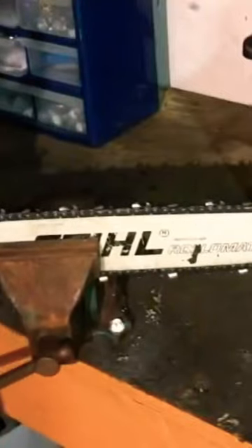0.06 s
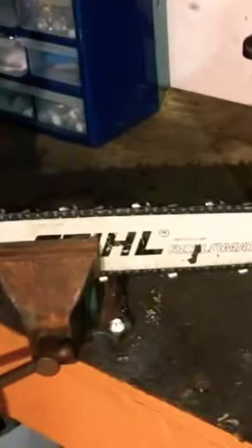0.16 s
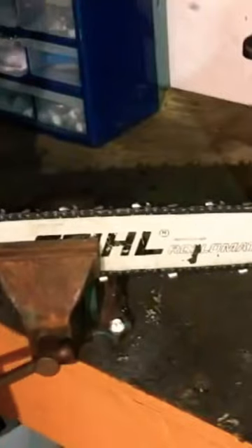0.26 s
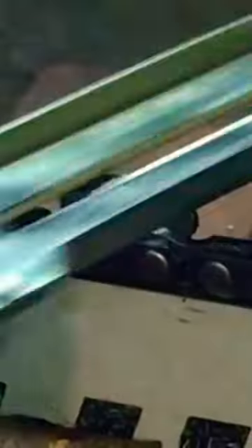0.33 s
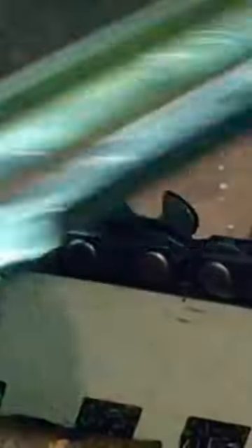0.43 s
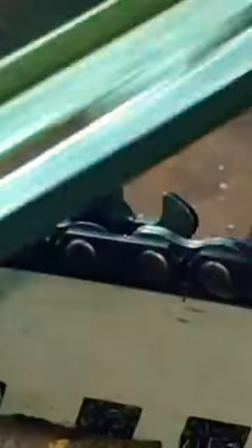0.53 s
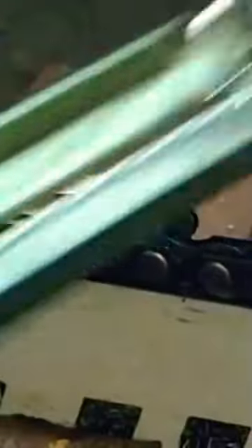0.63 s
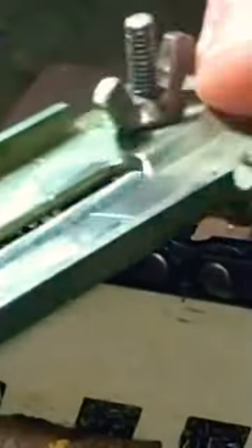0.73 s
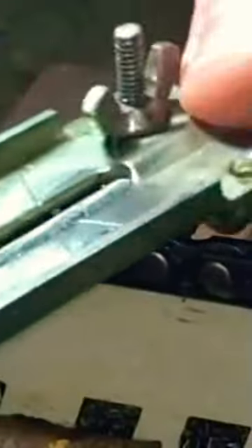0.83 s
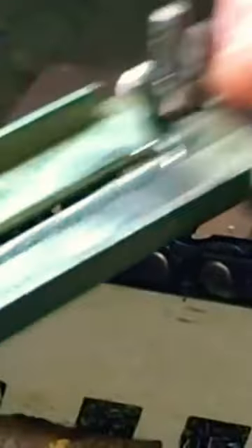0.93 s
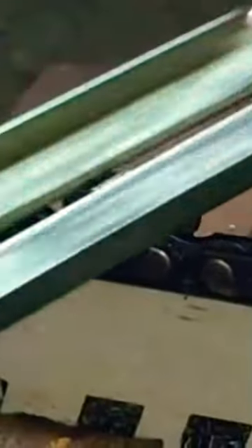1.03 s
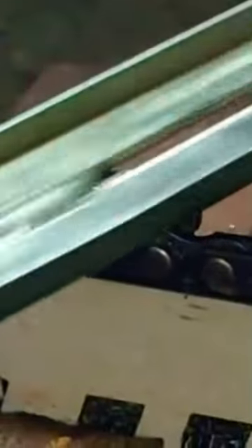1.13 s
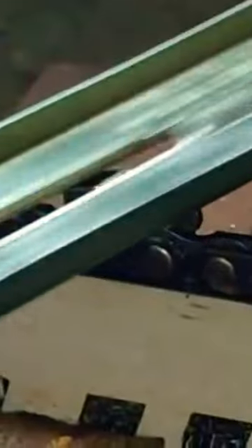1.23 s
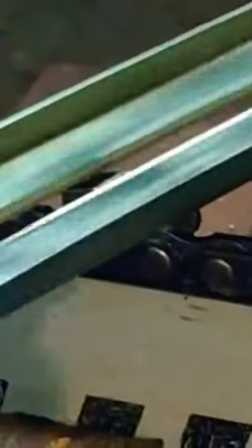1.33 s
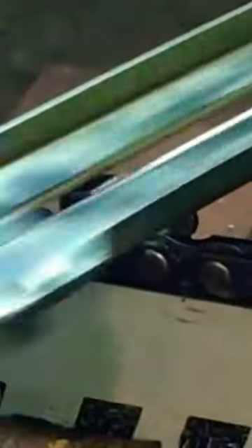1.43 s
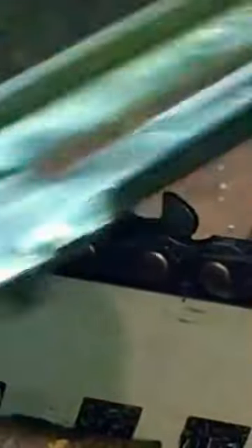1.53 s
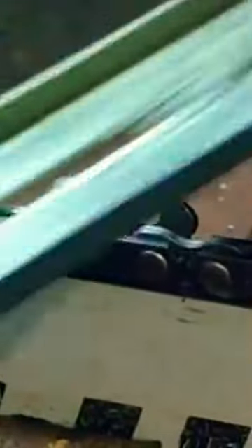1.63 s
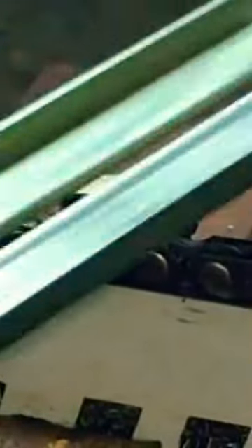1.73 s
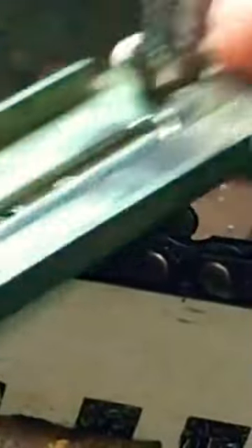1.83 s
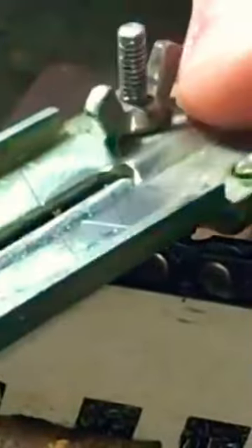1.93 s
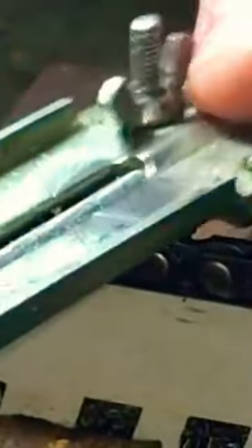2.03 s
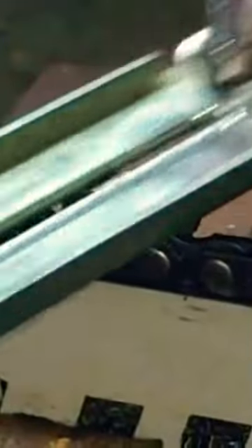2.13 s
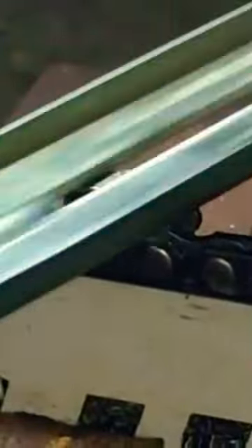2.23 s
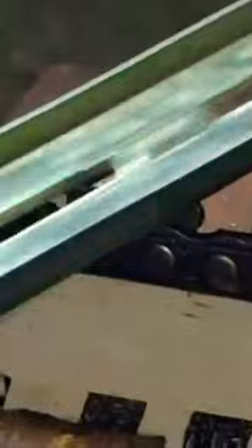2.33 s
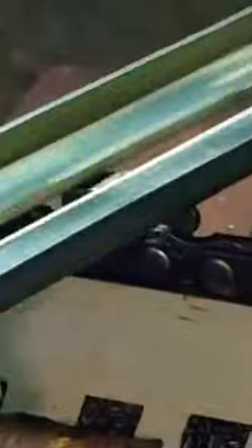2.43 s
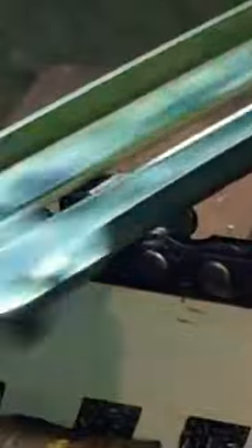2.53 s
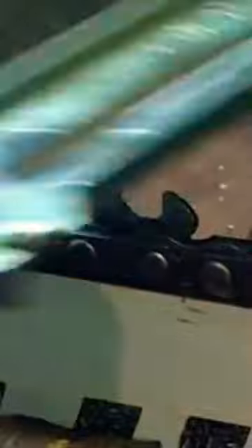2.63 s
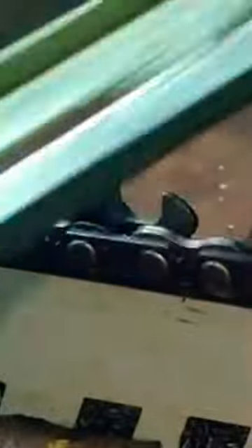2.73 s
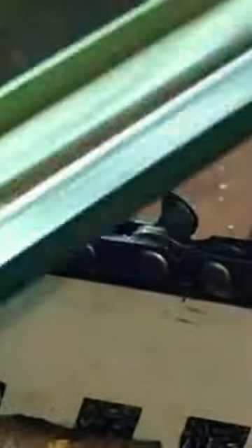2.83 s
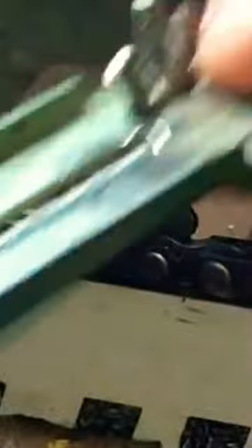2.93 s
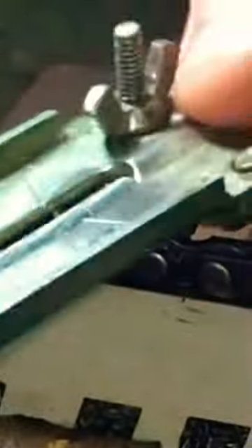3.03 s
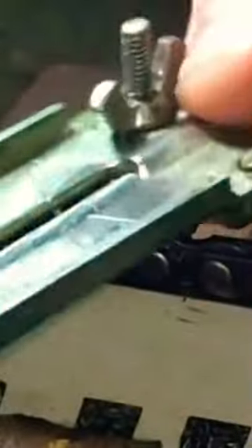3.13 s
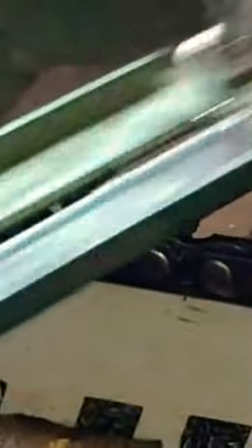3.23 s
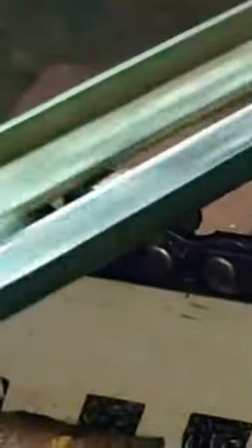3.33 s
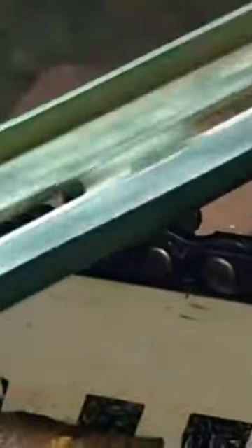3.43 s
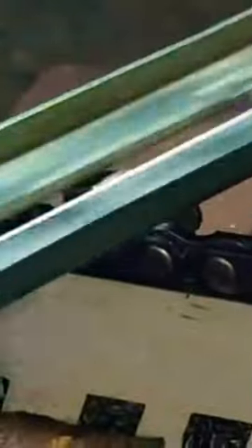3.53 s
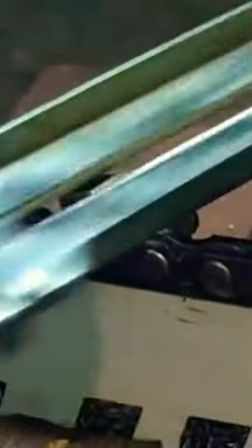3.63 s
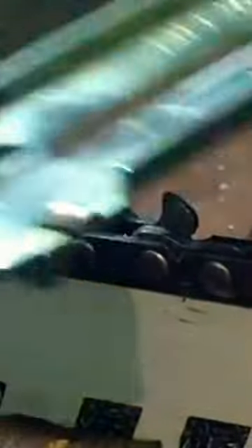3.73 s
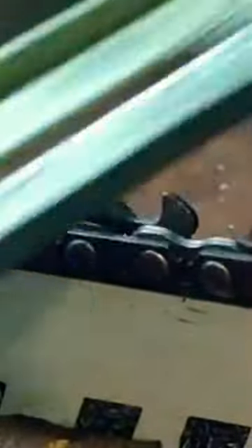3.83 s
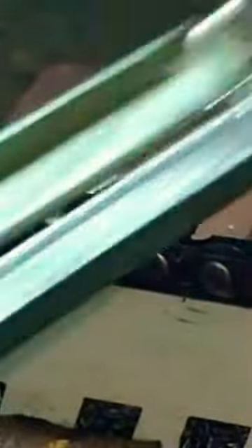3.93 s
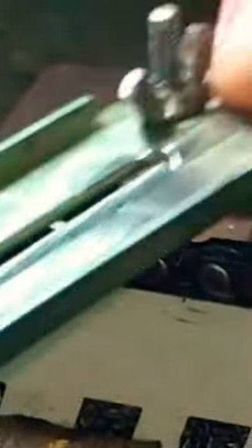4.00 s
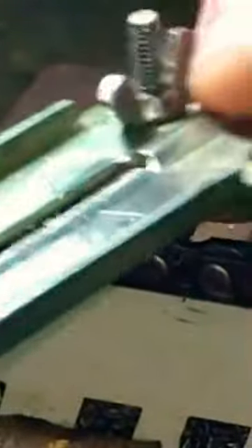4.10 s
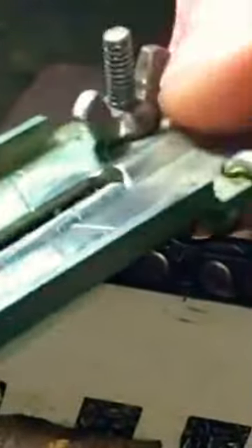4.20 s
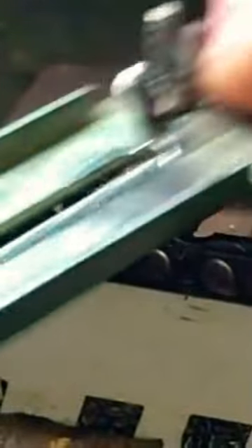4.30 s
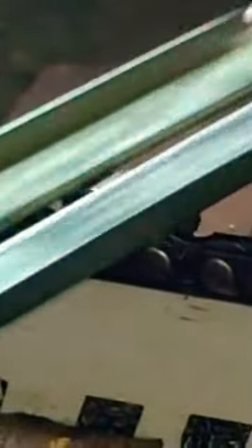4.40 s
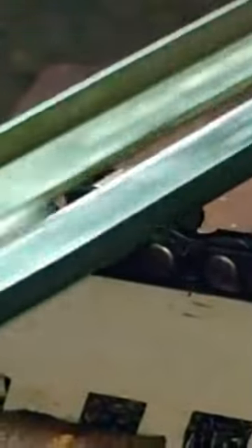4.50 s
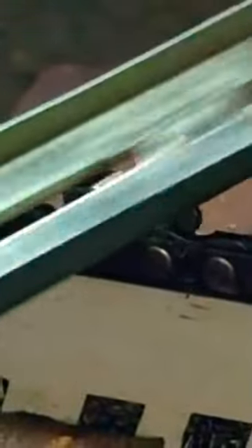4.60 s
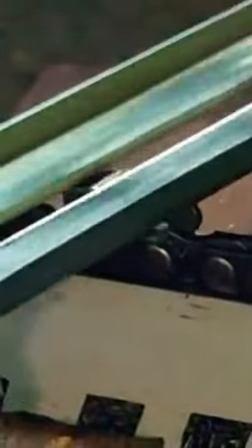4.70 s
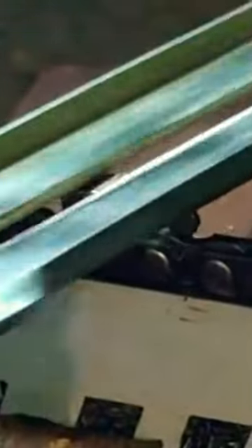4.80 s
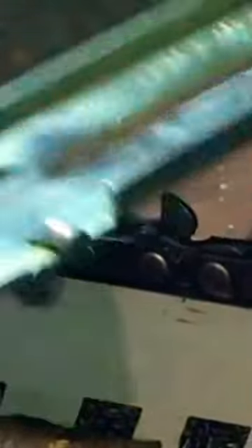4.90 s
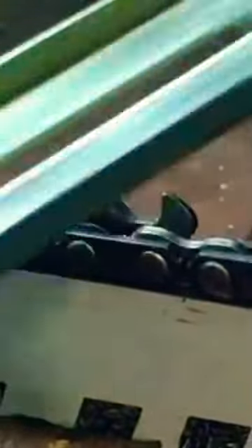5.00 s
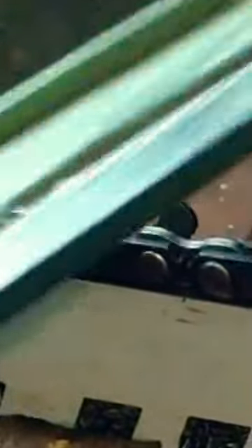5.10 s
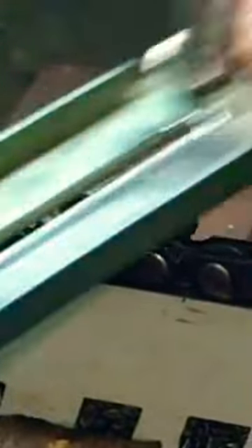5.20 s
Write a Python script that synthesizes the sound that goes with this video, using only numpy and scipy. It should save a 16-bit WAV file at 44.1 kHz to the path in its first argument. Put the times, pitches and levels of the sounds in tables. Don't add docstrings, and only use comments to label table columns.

```python
import sys
import numpy as np
from scipy import signal
from scipy.fft import rfft, irfft
from scipy.io import wavfile
from scipy.ndimage import uniform_filter1d, map_coordinates

SR = 44100
rng = np.random.default_rng(int(sys.argv[2]) if len(sys.argv) > 2 else 0)


def boost_factor(decibels):
    exponent = np.asarray(decibels, float) / 20
    return 10 ** exponent


def waveform_to_disk(signal):
    frames = np.transpose(np.atleast_2d(signal))
    scaled = np.clip(frames, -1, 1) * 32767
    samples = np.round(scaled).astype(np.int16)
    wavfile.write(sys.argv[1], SR, samples)


N = 231853

# (start [s], end [s])
STROKES = [
    (-.05, 0.32),
    (1.08, 1.61),
    (2.2, 2.78),
    (3.27, 4),
    (4.42, 5.07),
]
# (time [s], pressure [dB], edge bite [dB])
PUSHES = [
    [(.327, -38, -2), (.341, -35.5, -3), (.379, -39.5, 1), (.391, -35.5, 0), (.443, -40, 1.5),
     (.489, -55, 4), (.65, -70, 5)],
    [(1.04, -55, -2.5), (1.124, -36.5, 1), (1.21, -34.5, 2), (1.54, -37.5, -1.5), (1.56, -53.5, -1),
     (1.606, -51, 0.5), (1.632, -65, -2), (1.73, -71, 1)],
    [(2.12, -65.5, -1), (2.194, -46, 0), (2.326, -34.5, 2), (2.45, -35, 1), (2.594, -36.5, -2.5),
     (2.668, -40, 1.5), (2.704, -56.5, 4), (2.83, -69, 2)],
    [(3.23, -67, 3), (3.268, -49.5, -3), (3.324, -40, 1), (3.39, -37, 2), (3.634, -36, 1.5),
     (3.75, -38.5, 1), (3.794, -60.5, 3.5), (3.91, -71, -1)],
    [(4.385, -72, -4), (4.39, -49.5, -1), (4.478, -38, 3), (4.65, -35, 1), (4.776, -35, 2.5),
     (4.93, -42, -1.5), (4.966, -60, -1.5), (5.13, -71, -5)],
]
# (level above pressure [dB], share of bite [dB per dB])
PARTS = [
    (-14, -.5),
    (-5, -.5),
    (-7, .6),
    (-9.5, 1.0),
    (-4.5, -.5),
]
THUD, BAR, FILE, FIZZ, BENCH = range(5)
# (frequency [Hz], width [Hz], level [dB], swell [dB], turn [rad])
STEEL_MODES = [(496, 70, -17, -4, .2), (725, 65, 4.5, 4, 1.3), (1010, 80, 0.5, -7.5, 2.13),
               (1497, 38, -0.5, 4.5, 4.6), (1628, 106, -2.5, 7, 1.4), (2195, 84, -6.5, 13, 0.43),
               (2375, 120, 0, 4, 1.6), (2520, 105, -6, 6, 3.6), (2650, 110, -4, 6, 2.2),
               (3473, 150, -8.5, -6, 2.8), (3730, 160, -4.5, 10, 4.13), (3980, 150, -13, 8.5, 3.5),
               (4250, 200, -9, 11.5, 3.5), (4500, 200, -9, 6, 5.6), (5726, 73, -2, 3.5, 0.75),
               (5930, 170, -13, 19.5, 5.4), (6420, 40, -5.5, -1.5, 3.8), (8400, 130, -13.5, 0, 2.2),
               (9100, 87, -23, -9, 6.2), (11280, 390, -19, 8, 1.9), (12200, 250, -14, 1, 1.1),
               (14000, 410, -20, 5.5, 1.4)]
# (frequency [Hz], density [dB per Hz])
GRIT_SPECTRUM = [(200, -34.5), (380, -3), (600, -7), (1000, -2), (1600, -4.5), (2450, -1), (3050, -13),
                 (4200, -5), (5100, -9), (6100, -12), (8000, -16), (10500, -18.5), (13500, -20.5),
                 (15600, -18.5)]
# (time [s], slide [s], steel [dB], fizz above steel [dB], wood [dB])
LANDINGS = [(.861, 0.0054, -43, 0, -49), (0.943, 0.048, -64, 4, -52), (0.977, 0.0056, -47, 6.5, -43.5),
            (2.031, 0.0063, -48, 9, -43), (3.122, 0.014, -59, 8, -48), (4.133, 0.038, -49.5, -1.5, -46.5),
            (4.257, 0.058, -59, 7.5, -48), (4.974, 0.0084, -55, -4, -64)]
LIFT_RATES = [434, 673, 945, 1160, 237]
# (time [s], peak [dB], treble above peak [dB], ring above peak [dB], decay [s])
KNOCKS = [(0.8608, -38.5, -7, 0, 0.027), (0.9488, -33.5, -10, -10, 0.017), (0.9562, -40, 6, -23, 0.0072),
          (0.9747, -27, -28, -3.5, 0.017), (0.9811, -35.5, 13.5, -10, 0.011), (1.5342, -27, 0, -11, 0.023),
          (2.0308, -33, 0.5, -8, 0.033), (2.2978, -30, -12, -11, 0.028), (2.6626, -18, -19, -12, 0.017),
          (3.1222, -36.5, -5, -5, 0.018), (3.134, -42.5, 11.5, -15, 0.0074), (4.0164, -69, 14, -13, 0.018),
          (4.1335, -32, -1.5, -8, 0.028), (4.257, -41, -3, 0, 0.022), (4.2639, -32.5, 1.5, 2.5, 0.053),
          (4.282, -32.5, -12, -17, 0.046), (4.3114, -45, -1, -9, 0.021), (4.976, -44, -3, -8, 0.024)]
# (time [s], peak [dB])
SLIPS = [(0.2088, -53), (1.077, -40), (1.599, -41), (2.175, -50), (3.2627, -39), (4.1598, -36),
         (4.3887, -43)]
# (treble above peak [dB], ring above peak [dB], decay [s])
SLIP_TONE = (-32, -21, 0.012)
# (frequency [Hz], level [dB], decay [s])
HOLDER_MODES = [(1868, -6, .02), (2600, -6, .03), (4100, -8, .02), (6471, 3, .075), (8075, -14, .03),
                (9970, -12, .04), (12540, -11, .015), (14550, -10, .015)]
# (frequency [Hz], width [Hz], level [dB])
BENCH_MODES = [(111, 26, -3), (123, 109, -10.5), (179.6, 20.3, -1.5), (202.4, 26.7, 0.5), (257.2, 20, -6),
               (263.5, 12.6, 1.5)]
# (time [s], sway [dB], bench above pressure [dB])
JOLTS = [(0.359, -39.5, 5.5), (.47, -39.5, 1), (.54, -51, -5), (.92, -51, 0), (1.0, -52, 21),
         (1.2, -46, -4), (1.33, -39.5, 3.5), (1.44, -43.5, 0.5), (1.9, -59, 0), (2.06, -52, 0),
         (2.27, -39.5, 3.5), (2.48, -41, 0), (2.62, -45, -1), (3.15, -54.5, 0), (3.36, -43, -1),
         (3.55, -40, 7), (3.73, -44, -4.5), (4.45, -48, 6), (4.55, -41, 3), (4.68, -32.5, 1.5),
         (4.86, -48, 6.5), (4.919, -40.5, -3.5), (5.02, -44.5, -2), (5.09, -55, -1)]
# (frequency [Hz], density [dB per Hz])
AIR_FIRST = [(15, -40), (25, -7), (60, 6.5), (245, -7.5), (457, -6), (600, -18), (669, -11), (1010, -16.5),
             (1150, -14), (1680, -16.5), (2820, -20.5), (3510, -20), (16500, -38)]
# (frequency [Hz], density [dB per Hz])
AIR_SECOND = [(53, -35), (90, -1), (119, -11.5), (145, -19), (183, 3.5), (209, -17.5), (301, -14),
              (328, -17.5), (1250, -26), (1480, -26.5), (2430, -25.5), (3900, -31.5), (4640, -31.5),
              (15500, -40.5)]
# (time [s], swell [dB])
RETURNS = [(.56, 3.5), (.72, 2.5), (1.03, 5.5), (1.96, 2), (2.97, 2), (3.08, 0.5), (4.27, 3.5)]
# (time [s], frequency [Hz], level [dB], spread [s])
SQUEAK = (1.88, 4570, -75, .012)

CUT_S = .327
BAND_EDGES_HZ = (640, 3100, 7400)


def rasp():
    rest = steel(bites(share=.32, spread_db=1.6)) * boost_factor(0.49 * walk(150) + 0.96 * walk(39))
    wood, rest = split(rest, BAND_EDGES_HZ[0], order=5)
    push_thud = level(split(wood, 610, order=1)[0], 0)
    out = push_thud * boost_factor(pushed(THUD) + 1.84 * walk(14))
    land_thud = level(split(wood, 450, order=3)[0], 0)
    out += land_thud * landed(THUD)
    for part, hz in zip((BAR, FILE), BAND_EDGES_HZ[1:]):
        band, rest = split(rest, hz, order=5)
        out += level(band, 0) * np.hypot(boost_factor(pushed(part)), landed(part))
    return out + level(rest, 0) * np.hypot(boost_factor(pushed(FIZZ)), landed(FIZZ))


def bites(share, spread_db):
    size = boost_factor(spread_db * rng.exponential(size=N)) * (rng.random(N) < share)
    return level(size * rng.standard_normal(N), 0)


def steel(drive):
    t = np.arange(N) / SR
    place = 5.5 * np.interp(t, np.ravel(STROKES), np.tile([0, 1], len(STROKES)))
    rings = 0
    for hz, width, db, swell_db, turn in STEEL_MODES:
        damped_width = max(width, 70, hz / 24)
        mode_db = db + swell_db * np.cos(place - turn) + 2.55 * walk(18)
        rings = rings + boost_factor(mode_db) * resonate(drive, hz, damped_width)
    seat_db = .4 * np.clip(pushed(FILE) + 45, -20, 0) - 5 * (np.arange(N) < .7 * SR)
    grit = patchy(colour(drive[::-1], GRIT_SPECTRUM), spread_db=2.6, wide=2, long=7)
    return level(grit, -3) + level(rings, -2.2) * boost_factor(seat_db)


def patchy(x, spread_db, wide, long):
    cells = signal.stft(x, nperseg=512)[2]
    field = rng.standard_normal(cells.shape)
    field = uniform_filter1d(uniform_filter1d(field, wide, axis=0), long, axis=1)
    return signal.istft(cells * boost_factor(spread_db * field / field.std()), nperseg=512)[1][:N]


def pushed(part):
    t, db = np.arange(N) / SR, np.full(N, -150.)
    above_db, bite_share = PARTS[part]
    for s, pressure_db, bite_db in map(np.transpose, PUSHES):
        span = (t >= s[0]) & (t < s[-1])
        db[span] = np.interp(t[span], s, pressure_db + above_db + bite_share * bite_db)
    return db


def landed(part):
    t, power = np.arange(N) / SR, 0
    for s, slide, steel_db, fizz_db, wood_db in LANDINGS:
        db = (wood_db, steel_db, steel_db - 9, steel_db + fizz_db, wood_db + 3)[part]
        rise = np.clip((t - s) / 0.0013, 0, 1)
        fall_db = LIFT_RATES[part] * np.maximum(t - s - slide, 0)
        power = power + (rise * boost_factor(db - fall_db)) ** 2
    return np.sqrt(power)


def knocks():
    out, t = np.zeros(N + SR), np.arange(SR // 10) / SR
    slips = [(*slip, *SLIP_TONE) for slip in SLIPS]
    for s, db, treble_db, ring_db, decay in KNOCKS + slips:
        noise = rng.standard_normal(len(t)) * decaying(t, max(decay, .002))
        low, high = split(split(noise, 710)[1], 5570)
        crack = low / np.abs(low).max() + boost_factor(treble_db) * high / np.abs(high).max()
        ring = 0
        for hz, mode_db, t60 in HOLDER_MODES:
            gain_chance, pitch_chance = rng.standard_normal(2)
            tone = np.sin(2 * np.pi * hz * (1 + 0.00033 * pitch_chance) * t)
            ring = ring + boost_factor(mode_db + gain_chance) * tone * decaying(t, t60)
        i = int(s * SR)
        out[i:i + len(t)] += boost_factor(db) * (crack + boost_factor(ring_db) * ring / np.abs(ring).max())
    return out[:N]


def bench():
    hum = 0
    for hz, width, db in BENCH_MODES:
        mode = resonate(resonate(rng.standard_normal(N), hz, 1.5 * width), hz, 1.88 * width)
        hum = hum + boost_factor(db + 0.47 * walk(12)) * mode
    push = rng.standard_normal(N)
    sway = resonate(resonate(push, 45.8, 25), 56.4, 32)
    sway += boost_factor(-7) * resonate(resonate(push, 56.8, 19), 58.6, 48)
    sway = level(split(sway, 43)[1], 0)
    sway_db, load_db = rocking()
    shake = np.hypot(boost_factor(fade(pushed(BENCH) + load_db, db_per_s=194)), landed(BENCH))
    near = np.arange(N) > CUT_S * SR
    return level(hum, 0) * shake + sway * boost_factor(sway_db) * near


def rocking():
    s, sway_db, bench_db = np.transpose(JOLTS)[:, :, None]
    late = np.arange(N) / SR - s
    sway = sway_db - np.maximum(-late * 193, late * 109)
    load = bench_db * np.exp(-(late / 0.039) ** 2 / 2)
    return np.maximum(sway.max(axis=0), -60.5), load.sum(axis=0)


def fade(db, db_per_s):
    slope = db_per_s * np.arange(N) / SR
    return np.maximum.accumulate(db + slope) - slope


def workshop():
    t = np.arange(N) / SR
    far = level(colour(rng.standard_normal(N), AIR_FIRST), -66)
    far += level(resonate(rng.standard_normal(N), 1135, 28), -77.5)
    stir_db = sum(db * np.exp(-((t - s) / 0.089) ** 2 / 2) for s, db in RETURNS)
    near_db = -64.5 + stir_db + 0.41 * walk(4.27)
    near = level(colour(rng.standard_normal(N), AIR_SECOND), 0) * boost_factor(near_db)
    singing = level(resonate(rng.standard_normal(N), 2480, 150), -81.5)
    near += singing * boost_factor(2.2 * stir_db + 1.7 * walk(7))
    s, hz, db, spread = SQUEAK
    squeak = boost_factor(db) * np.exp(-((t - s) / spread) ** 2 / 2) * np.sin(2 * np.pi * hz * t)
    return np.where(t < CUT_S, far, near) + squeak


def walls(work):
    t = np.arange(SR // 2) / SR
    response = split(rng.standard_normal(len(t)), 2200, order=1)[0] * decaying(t, 0.12)
    return signal.fftconvolve(work, response / np.sqrt(np.sum(response ** 2)))[:N]


def decaying(t, t60):
    return np.exp(-np.log(1000) * t / t60)


def level(x, db):
    return x * boost_factor(db) / np.sqrt(np.mean(x ** 2))


def colour(x, shape):
    hz, db = np.transpose(shape)
    grid = np.log(np.maximum(np.fft.rfftfreq(2048, 1 / SR), 1))
    cepstrum = irfft(np.interp(grid, np.log(hz), db) * np.log(10) / 20)
    cepstrum[1:1024] *= 2
    cepstrum[1025:] = 0
    return signal.fftconvolve(x, irfft(np.exp(rfft(cepstrum))))[:N]


def resonate(x, hz, width):
    return signal.lfilter(*signal.iirpeak(min(hz, .45 * SR), hz / max(width, 1), fs=SR), x)


def walk(rate):
    steps = np.arange(0, N + 64, 64)
    smooth = map_coordinates(rng.standard_normal(1024), [steps * rate / SR], order=3)
    return np.interp(np.arange(N), steps, smooth)


def split(x, hz, order=4):
    return [signal.sosfilt(signal.butter(order, hz, kind, fs=SR, output="sos"), x) for kind in ("low", "high")]


def scene():
    work = rasp() + knocks()
    mix = work + boost_factor(-12.5) * walls(work) + bench() + workshop()
    return np.tile(mix, (2, 1))


def top_cut(x):
    return signal.sosfilt(signal.butter(12, 16800, fs=SR, output="sos"), x)


def record(dry):
    mix = signal.sosfilt(signal.ellip(6, .5, 25, 15900, fs=SR, output="sos"), dry)
    return top_cut(mix)


dry = scene()
out = record(dry)
waveform_to_disk(out)
```